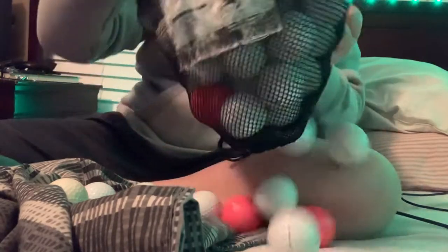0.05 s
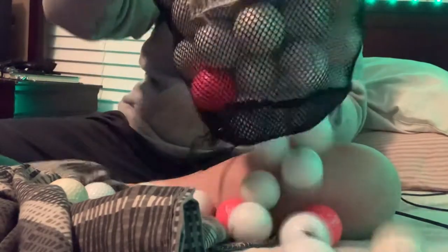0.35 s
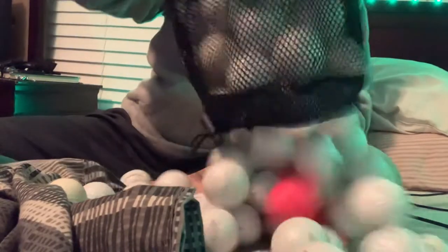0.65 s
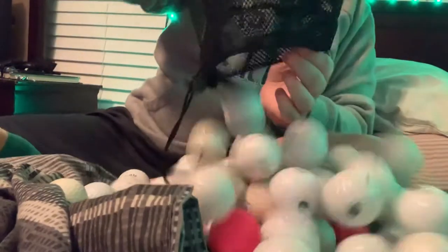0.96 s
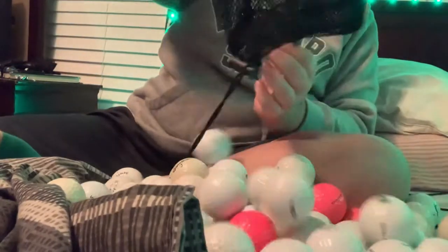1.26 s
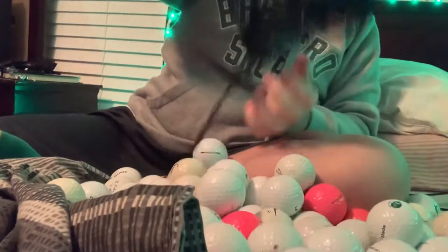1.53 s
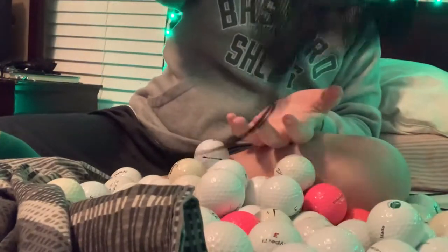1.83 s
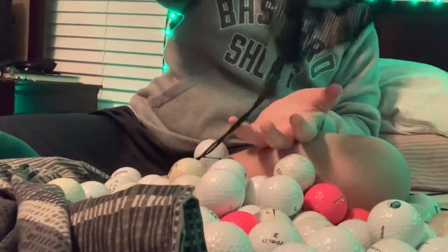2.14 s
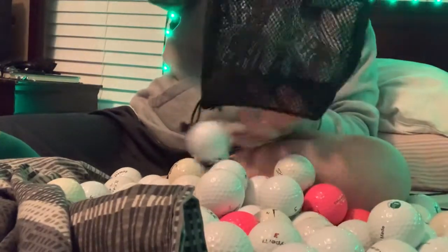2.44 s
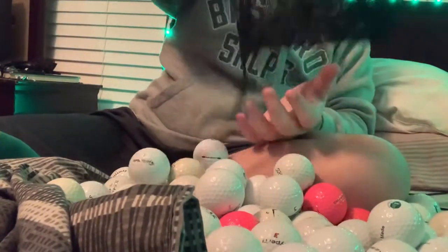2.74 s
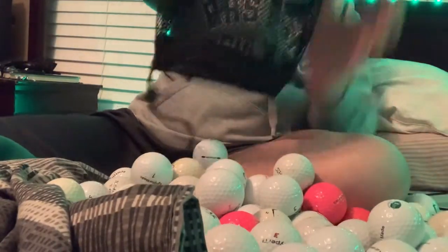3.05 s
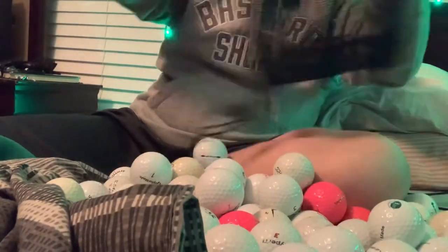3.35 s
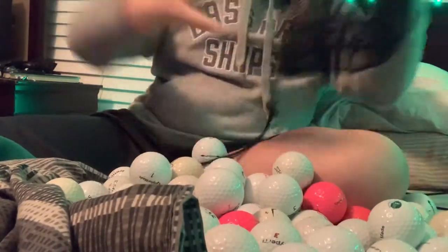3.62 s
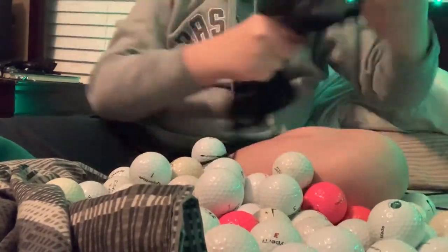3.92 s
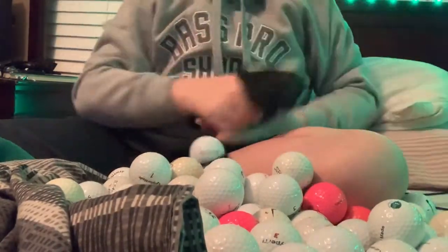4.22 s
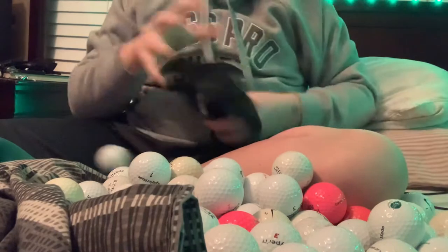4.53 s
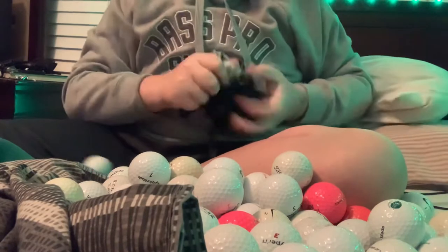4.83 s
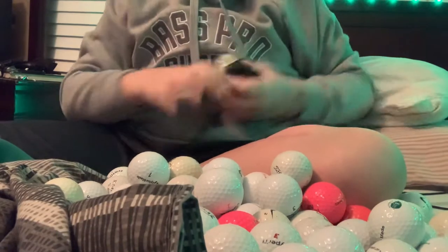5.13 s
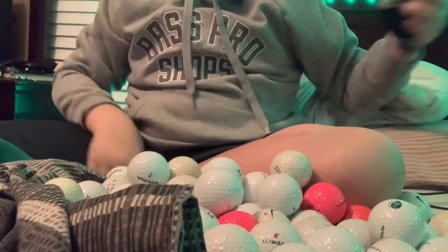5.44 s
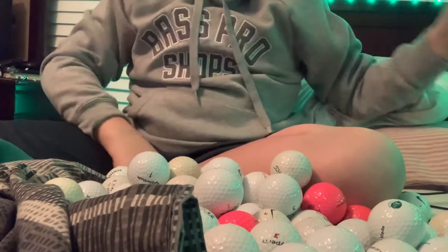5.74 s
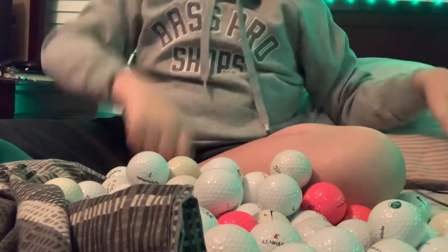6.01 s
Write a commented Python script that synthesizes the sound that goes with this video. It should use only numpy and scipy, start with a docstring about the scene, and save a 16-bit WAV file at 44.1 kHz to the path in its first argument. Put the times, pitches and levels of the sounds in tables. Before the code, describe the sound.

Golf balls spill from a mesh bag onto a pile on a bed, close up in stereo in a small bedroom. Separate hard clacks start at once and build into a dense clatter, loudest from about 0.5 to 1 second, with dull thuds and a low rumble from the mattress underneath. The clacks thin out and stop by 1.5 seconds. The bag rustles lightly, with a hollow tap at 2 seconds, and around 2.5 seconds a last ball drops with a thud and a few clicks. From about 3.2 seconds the empty bag is shaken and crumpled, much quieter than the pour, with dry ticks, scratches and puffy snaps near 3.3, 3.7 and 4.6 seconds. Softer rustling continues as it is put aside, and a hand brushes the pile with a soft bump near 5.9 seconds. A faint fan hums throughout.

```python
"""A small bedroom, close up in stereo: golf balls pour from a mesh bag onto a pile on the bed.
Each clack is a hollow knock, a ringing core and a ticking cover; the mattress thuds and booms below,
and a last ball drops out late. Then the empty bag is shaken, crumpled and put aside, its threads
catching and its folds puffing out air, and a hand brushes the pile. A faint fan hums throughout."""
import sys
import numpy as np
from scipy import signal
from scipy.fft import rfft, irfft, next_fast_len
from scipy.io import wavfile

SR = 44100
rng = np.random.default_rng(int(sys.argv[2]) if len(sys.argv) > 2 else 0)


def master_out(mix):
    """Clip the mix to full scale and print it as 16-bit PCM to the path in sys.argv[1]."""
    frames = np.transpose(np.atleast_2d(mix))
    ceiling = np.clip(frames, -1, 1)
    pcm = np.round(ceiling * 32767).astype(np.int16)
    wavfile.write(sys.argv[1], SR, pcm)


N = 267863
SIZE = next_fast_len(N)
TIME, FREQS = np.arange(N) / SR, np.fft.rfftfreq(SIZE, 1 / SR)

# Cue levels are set ahead of each layer's trim; colours give only the shape of a spectrum.
# fan tones: f/Hz, level/dB
FAN_TONES = [(243, -68), (67.7, -70.5)]
# colour of the room air: f/Hz, level/dB
AIR_COLOUR = [(15, -36), (60, 0.5), (130, -8.5), (250, -5.5), (400, -25), (600, -33), (800, -18.5),
              (1100, -36), (1400, -25.5), (1700, -33.5), (2600, -31.5), (5000, -36), (15000, -40)]
# how hard the balls stream out of the bag: t/s, level/dB
POUR = [(0, -50.5), (.16, -52.5), (.37, -44), (0.531, -36.5), (.67, -32.5), (.92, -34), (1.06, -41.5),
        (1.2, -51), (1.34, -62), (1.5, -79.5)]
# heavy landings of balls and hands on the bedding: t/s, level/dB, nominal f/Hz
HEAVY_LANDINGS = [(0, -26, 109), (0.021, -37, 120), (.168, -35, 172), (0.234, -26, 159), (.366, -26, 192),
                  (.452, -22.5, 158), (.496, -16.5, 123), (.586, -20, 127), (.639, -13.5, 186),
                  (.719, -14, 170), (.738, -19, 119), (.788, -17, 227), (.822, -22, 196), (0.865, -26, 305),
                  (.9, -16.5, 186), (.932, -14.5, 147.4), (0.958, -31, 134), (1.02, -28, 246),
                  (1.06, -31, 175), (1.114, -23.5, 152), (1.14, -18.5, 107), (1.234, -27, 161),
                  (1.262, -30, 98), (1.286, -30, 147), (1.336, -32.5, 185), (1.414, -33, 199),
                  (1.666, -42, 200), (2.018, -31, 113), (2.227, -47.5, 258), (2.343, -39, 167.4),
                  (2.42, -37.5, 153.5), (2.439, -42.5, 175.5), (2.466, -35.5, 183), (2.514, -27.5, 196),
                  (2.552, -38, 107), (2.576, -30.5, 126.7), (2.635, -32.5, 237), (2.67, -41.5, 253.6),
                  (2.951, -41.5, 234.7), (2.972, -37, 141.4), (3.015, -42, 134.7), (3.324, -37, 195),
                  (3.736, -47, 150), (3.883, -50, 127), (4.25, -46.5, 212), (4.942, -47, 101),
                  (5.202, -41.5, 250), (5.235, -38.5, 198), (5.28, -43.5, 239), (5.608, -44.5, 229),
                  (5.909, -35, 198.4), (5.947, -43, 93)]
# the mattress's answer to a landing: ratio to the thud pitch, level/dB, t60/s
MATTRESS_MODES = [(1, 0.5, .07), (.66, -7, 0.095), (1.55, -9, .07), (2.5, -16, .05)]
# the whole bed booming: f/Hz, level/dB, t60/s
BED_BOOM = [(52.1, -18, 0.35), (111.3, -18.5, .22), (226, -19, 0.13), (448, -30.5, 0.057)]
# bedding and clothes pushed about: middle t/s, length/s, level/dB
BEDDING_STIRS = [(1.634, 0.26, -55.5), (2.073, 0.18, -56.5), (2.566, 0.17, -44), (2.998, 0.14, -47.5),
                 (3.283, 0.21, -57), (3.75, 0.079, -50), (4.27, .07, -72), (4.593, 0.04, -52),
                 (5.09, 0.051, -53.5), (5.242, 0.12, -48.5), (5.653, 0.076, -53), (5.917, 0.039, -37.5),
                 (6.07, 0.05, -46)]
# colour of the bedding's rumble: f/Hz, level/dB
RUMBLE_COLOUR = [(15, -33), (30, -5.5), (48, 2), (80, 3), (112, 2.5), (150, -1.5), (240, -0.5), (320, -10),
                 (440, -7), (650, -20.5), (1400, -47.5), (3000, -59)]
# mesh sliding over itself and sleeves: middle t/s, length/s, level/dB, body offset/dB, fizz offset/dB
MESH_SLIDES = [(0.004, 0.075, -55.5, 11, 3.5), (.26, 0.12, -53.5, -3, 8), (0.397, 0.093, -45.5, -11, 1),
               (1.427, .14, -72, -7, 4), (1.584, 0.14, -62, -14.5, -1.5), (1.784, 0.25, -68.5, 5, -2),
               (1.981, 0.058, -56, -5, -2), (2.057, .06, -67, -9, 3), (2.189, 0.14, -65, 2.5, -3.5),
               (2.327, 0.09, -75.5, -6, 6), (2.585, 0.14, -70, 0, -11), (3.286, 0.14, -54, -12, 0.5),
               (3.416, 0.071, -60.5, -11, -6), (3.562, 0.15, -62, -19, 0), (3.806, 0.16, -50.5, -7, 0),
               (3.914, 0.25, -54.5, -25, -4), (4.077, 0.31, -57.5, -5, -1.5), (4.32, 0.2, -57.5, -1, 5.5),
               (4.493, 0.4, -73, -4, 7), (4.636, 0.12, -60.5, 3, 0), (4.723, 0.15, -61.5, 5.5, 8),
               (4.904, 0.044, -57.5, 4, 5), (5.055, 0.16, -56, 7, 4.5), (5.2, 0.18, -61, 3, -1.5),
               (5.388, 0.67, -74.5, -3.5, 2), (5.684, 0.28, -74.5, 7, 10), (5.788, 0.15, -65, -13, 4.5),
               (6.07, 0.064, -61.5, 1.5, 0.5)]
# the bag shaken or tugged taut: t/s, hold/s, level/dB, body offset/dB, swish offset/dB
BAG_FLAPS = [(1.75, .018, -49.5, -15, -17), (2.006, 0.0076, -53, -11, -1), (3.302, .06, -46, -10, 0),
             (3.694, 0.024, -44.5, -5, -5), (4.558, 0.026, -46, 0, 1), (5.901, .015, -44.5, -2, -39)]
# the four colours of the rustle, dark to bright: f/Hz, level/dB
MESH_BODY = [(80, 5), (200, 8), (380, 3.5), (600, 0.5), (1000, -1.5), (1500, -3.5), (2200, -7), (2800, -15),
             (3600, -27)]
MESH_SWISH = [(1300, -30), (2000, -4), (2500, 5), (3000, -14), (3800, -13)]
MESH_RASP = [(1400, -16), (2100, -9.5), (2900, -5), (3700, 3.5), (4500, 2), (5500, -1), (6800, -3),
             (8000, -27.5)]
MESH_FIZZ = [(5800, -21.5), (7200, -3), (8500, 5.5), (11000, 3), (13000, 1.5), (15500, -2)]
# foreground hits, ball on ball: t/s, level/dB, hardness/dB (more means less knock), ring f/Hz
BALL_HITS = [(0.014, -42, -5, 4190), (0.0573, -33, 4.5, 2950), (.0942, -31, 0, 4160),
             (0.1656, -39.5, 7, 3660), (0.2124, -38.5, 2.5, 5400), (0.236, -35, 2, 4040),
             (0.2961, -36.5, 2.5, 3890), (0.3092, -34, 0.5, 4150), (0.351, -35, -0.5, 3680),
             (0.3705, -42, -11.5, 4100), (.383, -35, -4, 3650), (0.394, -35.5, 4, 3980),
             (0.4061, -32.5, 4.5, 4150), (0.4336, -39, -4, 3500), (0.4488, -25.5, 10, 4270),
             (0.457, -29.5, -1.5, 3760), (0.475, -34.5, 1, 3880), (0.4946, -29, -0.5, 4330),
             (.5087, -28, 1, 4740), (0.52, -31, 2.5, 3950), (0.53, -30, -3, 3760), (0.5385, -30, 4, 3880),
             (.548, -25, 4, 4580), (.5664, -25, -2.5, 4330), (0.57, -34.5, 1.5, 4250),
             (0.5782, -29, 6, 5200), (0.5864, -33, -1.5, 4030), (0.6118, -24, 1, 4220),
             (0.619, -26, 2, 4100), (0.6402, -23.5, 2, 3760), (0.657, -26.5, -1, 4380),
             (0.672, -37, -0.5, 4030), (.6823, -31, 11.5, 6000), (0.7039, -23, 6, 4230),
             (0.7179, -28.5, 7.5, 3690), (0.7251, -25.5, 1.5, 5730), (0.7297, -30, 1, 4300),
             (.7565, -35.5, 3.5, 4240), (0.7685, -33.5, -9.5, 4130), (.7824, -31.5, 3.5, 4500),
             (0.7897, -32.5, 1, 3960), (0.7945, -27.5, -3.5, 4420), (.8073, -35.5, -2.5, 3940),
             (.8211, -31.5, -8.5, 4300), (0.8265, -37, -1, 4240), (0.8608, -26, 5, 6100),
             (0.8635, -22, -1.5, 4760), (0.8739, -23, 3.5, 3250), (0.8817, -23, 3.5, 3680),
             (.8918, -36.5, -1, 3550), (0.8965, -29.5, -3, 3940), (0.9055, -30, -1, 3720),
             (0.9222, -30, -2, 3940), (0.9329, -31.5, -1, 4350), (0.9533, -30.5, -3.5, 4020),
             (.973, -28.5, 2, 3720), (0.992, -30.5, -2.5, 3870), (1.0015, -37, 5, 4340),
             (1.0153, -35.5, -4, 4870), (1.0199, -27, -1, 4000), (1.033, -40.5, 6, 3800),
             (1.0642, -35.5, 0.5, 3600), (1.069, -36.5, -0.5, 4460), (1.0835, -45.5, 9.5, 4310),
             (1.1131, -24.5, 1, 3630), (1.134, -29.5, 3, 4050), (1.143, -35.5, 0, 3280),
             (1.1597, -45.5, -1, 4050), (1.1686, -48, 0, 4780), (1.2018, -38.5, 6.5, 4320),
             (1.2518, -39.5, 2, 3980), (1.2548, -45, 14, 4970), (1.271, -42, 4, 5400),
             (1.283, -46, -6, 3400), (1.3172, -35, 6, 4270), (1.348, -51.5, -3, 4120),
             (1.4249, -51.5, 0.5, 4570), (1.5027, -60.5, -8, 4040), (2.4654, -64.5, -13, 3900),
             (2.5127, -50, -7.5, 3600), (2.546, -47.5, -5.5, 4220), (2.5752, -43.5, 2, 4280),
             (2.6133, -57, -6, 4420)]
# the ring of a ball's core: ratio to the ring pitch, level/dB, t60/s
CORE_MODES = [(1, 0, .0105), (1.14, -5, .01), (.88, -11, .008), (.63, -9, .007), (1.43, -7, .008),
              (1.92, -9, .006)]
# mesh and cord snapping: t/s, level/dB, knock offset/dB, tick offset/dB
CORD_SNAPS = [(1.5378, -50.5, -6, 9), (1.7509, -40.5, -10, -12), (1.9797, -46.5, -17, 4.5),
              (2.2906, -49.5, -7, 3), (3.2013, -51.5, -10, -11), (3.2198, -50.5, -2, 2),
              (3.3108, -33.5, -9.5, -3.5), (3.3625, -39, -16, -12), (3.4038, -52, -2, -8),
              (3.6096, -50, -10, 1), (3.7188, -36, -6, -17), (3.7766, -41.5, -8, 0.5),
              (4.0148, -42, -6.5, -8), (4.1547, -48.5, -3.5, 1), (4.2623, -41, -9.5, -13),
              (4.5628, -32.5, -6.5, -12), (4.586, -46, 7, 4), (4.5957, -49, -2, 10), (4.7108, -56, -8, 7),
              (4.721, -62, 6, 2), (4.738, -58, 9, 0), (4.7754, -52, -5, 2), (4.9087, -48.5, 0, -10),
              (4.9158, -55, 3, -4), (5.0458, -48, 14, 10), (5.059, -59, 7, -7), (5.0978, -49.5, 7, 0),
              (5.109, -56, 11.5, -3), (5.1632, -39, -8, -26), (5.2167, -53, 6, 3), (5.2875, -51, -6, -9),
              (5.389, -59.5, -1, -1), (5.8828, -48, -2.5, 4), (5.9004, -44, -5, -7)]
# short scrapes of mesh on mesh: middle t/s, length/s, level/dB, f/Hz
MESH_SCRATCHES = [(1.582, 0.066, -56, 5670), (1.77, 0.0093, -47, 4200), (3.295, 0.033, -52, 6500),
                  (3.316, .018, -49, 2680), (3.367, 0.014, -40, 3000), (3.592, 0.041, -60, 5750),
                  (3.697, .008, -46, 2950), (3.779, .014, -44.5, 3900), (4.202, 0.078, -67, 1700),
                  (4.263, .014, -59, 3200), (4.283, 0.024, -58, 1700), (4.521, 0.055, -65.5, 2170),
                  (4.72, .012, -58, 1500), (4.918, 0.0091, -60, 2200), (5.018, 0.037, -55, 1810),
                  (5.103, 0.03, -59, 1910), (5.745, 0.083, -56.5, 5660), (5.83, 0.078, -59, 5500),
                  (5.985, 0.044, -65, 5960)]
# one hollow tap as a ball is knocked: t/s, level/dB, f/Hz, t60/s
HOLLOW_TAP = (2.0135, -33.5, 1320, .021)
# air clapped out of the folds: t/s, level/dB, f/Hz
AIR_POPS = [(2.017, -50, 480), (2.229, -58, 480), (3.311, -44, 745), (3.3155, -43, 695), (3.334, -49, 420),
            (3.3844, -49.5, 600), (3.6974, -43.5, 446), (3.7181, -45, 650), (3.766, -48, 517),
            (3.823, -49, 710), (4.0256, -54.5, 755), (4.562, -44, 580), (4.583, -46, 565),
            (4.596, -41.5, 480)]
# hands and sleeves on cloth and balls: middle t/s, length/s, level/dB, f/Hz, width/octaves
HAND_RUBS = [(2.175, .04, -64, 1160, 1.9), (2.194, 0.034, -57, 635, 1), (2.928, .035, -61.5, 716, 2.06),
             (2.961, 0.046, -52.5, 420, 1.6), (2.966, 0.046, -65, 1150, 1.6), (3.007, .05, -63, 846, 1.4),
             (3.06, 0.071, -65, 328, 0.91), (5.615, 0.0093, -57, 730, .4), (5.722, 0.15, -65.5, 492, 0.14),
             (5.722, 0.029, -62, 1430, .3), (5.766, 0.016, -56.5, 1410, .4),
             (5.915, .025, -42.5, 594, 0.33), (5.919, 0.041, -47, 1420, 0.4), (6.0, 0.15, -64, 500, 0.28),
             (6.065, 0.026, -60, 270, 0.91)]
# stereo image of the balls, and of cloth and air: f/Hz, left-right likeness (-1 to 1)
BALLS_IMAGE = [(40, 0.94), (150, 0.94), (500, 0.92), (1600, 1), (2300, .7), (3000, -0.26), (4300, .35),
               (5600, -0.72), (6800, 0.53), (7600, 1), (15000, .93)]
CLOTH_IMAGE = [(40, 0.8), (150, 0.84), (1700, 0.94), (2600, 0.59), (4200, 0.52), (5500, -0.59),
               (6600, -0.065), (7500, 1), (15000, 1)]

KNOCK_HZ, RING_HZ, TICK_HZ = (375, 1690), (1840, 7500), (6200, 11600)
POUR_END_S = POUR[-1][0]
SETTLE_S = .08  # the bed moves this long after the stream


def amp(db):
    """Decibels to gain."""
    return 10 ** (np.asarray(db) / 20)


def unit_rms(x):
    """Scales to rms 1."""
    return x / np.sqrt(np.mean(x ** 2) + 1e-20)


def at_level(x, db):
    """Sets the rms of a hit's first 4 ms."""
    return amp(db) * x / np.sqrt(np.mean(x[:, :176] ** 2, axis=1, keepdims=True) + 1e-20)


def add(mix, s, sound):
    """Mixes a sound in at time s."""
    part = mix[..., max(round(s * SR), 0):][..., :sound.shape[-1]]
    part += sound[..., :part.shape[-1]]


def band(x, edges, order=2):
    """Causal band-pass."""
    return signal.lfilter(*signal.butter(order, np.clip(edges, 60, SR / 2 - 500), "band", fs=SR), x)


def curve(points):
    """Joins points on a log frequency axis."""
    hz, value = np.transpose(points)
    return np.interp(np.log(FREQS + 1), np.log(hz + 1), value)


def shaped(x, gain):
    """Multiplies the spectrum of x by a gain."""
    return irfft(rfft(x, SIZE) * gain, SIZE)[..., :N]


def coloured(x, colour):
    """EQs x with a colour, at rms 1."""
    return unit_rms(shaped(x, amp(curve(colour))))


def wander(rate_hz):
    """Smooth random drift of rms 1."""
    return unit_rms(shaped(rng.standard_normal(N), np.exp(-np.minimum(FREQS / rate_hz, 6) ** 2)))


def stereo_image(pair, likeness):
    """Turns two unrelated channels into a pair of the given likeness."""
    same = np.clip(curve(likeness), -1, 1)
    return np.array([pair[0], shaped(pair[0], same) + shaped(pair[1], np.sqrt(1 - same ** 2))])


def impulse(fade_s, scatter, late, late_s):
    """One click, its glancing echoes off what lies nearest, and a weak later wash."""
    t = np.arange(2048) / SR
    echoes = rng.standard_normal((2, len(t))) * (rng.random((2, len(t))) < .25)
    out = echoes * (scatter * np.exp(-t / fade_s) + late * np.exp(-t / late_s))
    out[:, 4] += rng.choice([-1, 1], 2)
    return out


def pour_db(s):
    """Strength of the stream at time s; it dies away once the bag is empty."""
    at, db = np.transpose(POUR)
    return np.interp(s, at, db) - 60 * np.clip((s - POUR_END_S) / .1, 0, 1)


def pour_moments(count):
    """Uneven moments all through the pour."""
    return (np.arange(count) + rng.random(count)) / count * POUR_END_S


def swell(middle_s, length_s, ends_db=-7.5):
    """A hand movement gathers speed and slows again."""
    return amp(ends_db * np.minimum(2 * abs(TIME - middle_s) / length_s, 10) ** 2)


def jerk(s, hold_s, rise_s=.0042, fall_s=.017):
    """Cloth snaps taut, holds and goes slack."""
    return np.exp(-np.maximum(s - TIME, 0) / rise_s - np.maximum(TIME - s - hold_s, 0) / fall_s)


def room_tone(air_db=-65.5, waver=.3):
    """Room air and a wavering fan hum."""
    drift = waver * wander(11)
    hum = sum(amp(db) * np.sqrt(2) * np.sin(2 * np.pi * hz * TIME + drift) for hz, db in FAN_TONES)
    air = stereo_image(coloured(rng.standard_normal((2, N)), AIR_COLOUR), CLOTH_IMAGE)
    return hum * (1 + drift) + amp(air_db) * air


def thud(db, hz, rise_s=.0037, sag=1.74, sag_s=.00248):
    """The mattress gives: its pitch sags as the ball sinks in, and the whole bed booms on."""
    t = np.arange(SR // 3) / SR
    bent_time = t + sag * sag_s * (1 - np.exp(-t / sag_s))
    swing = 0
    for ratio, mode_db, t60 in MATTRESS_MODES:
        mode_hz = hz * ratio * rng.normal(.923, .046)
        swing += amp(mode_db - 60 * t / t60) * np.sin(2 * np.pi * mode_hz * bent_time)
    boom = sum(amp(mode_db - 60 * t / t60) * np.sin(2 * np.pi * (mode_hz * t + rng.random()))
               for mode_hz, mode_db, t60 in BED_BOOM)
    give = 1 - np.exp(-t / rise_s)
    return amp(db) * (swing + boom) * give / abs(swing * give).max()


def heavy_landings(trim_db=-.86, rebound_s=.03, rebound_db=-11.5, rebound_pitch=.89):
    """Each big thud comes down once more, softer and lower."""
    out = np.zeros(N)
    for s, db, hz in HEAVY_LANDINGS:
        add(out, s, thud(db + trim_db, hz))
        add(out, s + rebound_s, thud(db + trim_db + rebound_db, hz * rebound_pitch))
    return out


def bedding_rumble(trim_db=-2, lump_db=3, rolling_db=5, fidget_db=-69):
    """Dull, lumpy weight of rolling balls, shifting bedding and clothes that never lie quite still."""
    rolling = amp(pour_db(TIME - SETTLE_S) + rolling_db)
    stirring = sum(amp(db) * swell(s, length) for s, length, db in BEDDING_STIRS)
    rumble = coloured(rng.standard_normal((2, N)), RUMBLE_COLOUR)
    return rumble * (rolling + amp(fidget_db) + stirring) * amp(trim_db + lump_db * wander(30))


def mesh_envelopes(flap_fizz_db=-3):
    """Strength of the rasp, body and fizz of the mesh over all slides and flaps."""
    moves = [amp([[db], [db + body], [db + fizz]]) * swell(s, length)
             for s, length, db, body, fizz in MESH_SLIDES]
    moves += [amp([[db], [db + body], [db + flap_fizz_db]]) * jerk(s, hold)
              for s, hold, db, body, _ in BAG_FLAPS]
    return np.sqrt(sum(move ** 2 for move in moves))


def thread_catches(per_s, ceiling, spread_db=3):
    """Sparse spikes of uneven size, one for each thread that catches."""
    size = amp(spread_db * np.minimum(rng.exponential(1, N), ceiling))
    return unit_rms(size * (rng.random(N) < per_s / SR))


def mesh_rustle(body_db=-3, rasp_db=-.5, fizz_db=1.96, swish_db=-5, flutter_db=1.72, shift_db=1.5):
    """Threads catch and slip: fine grains over a smooth hiss, in clumps of shifting colour."""
    grain = .77 + .5 * thread_catches(per_s=1600, ceiling=4)
    threads = rng.standard_normal((2, N)) * grain * amp(flutter_db * wander(62))
    rasp, body, fizz = (part * amp(shift_db * wander(27)) for part in mesh_envelopes())
    swish = sum(amp(db + offset) * jerk(s, hold) for s, hold, db, _, offset in BAG_FLAPS)
    return (coloured(threads, MESH_BODY) * body * amp(body_db)
            + coloured(threads, MESH_RASP) * rasp * amp(rasp_db)
            + coloured(threads, MESH_FIZZ) * fizz * amp(fizz_db)
            + coloured(threads, MESH_SWISH) * swish * amp(swish_db))


def mesh_crinkles(trim_db=-2, spread_db=4, low_hz=1600, high_hz=7000, width=1.35, count=320):
    """Folds give way one by one, each with its own colour, as loud as the rubbing is hard."""
    out, effort = np.zeros((2, N)), mesh_envelopes()[0]
    for when, force, pitch in rng.random((count, 3)):
        at, hz = int(when * N), low_hz * (high_hz / low_hz) ** pitch
        click = impulse(fade_s=.0012, scatter=.62, late=.031, late_s=.0089)
        crinkle = band(click, (hz / width, hz * width))
        add(out, at / SR, effort[at] * at_level(crinkle, trim_db + spread_db * (2 * force - 1)))
    return out


def clack(knock_db, ring_db, tick_db, ring_hz, detune=.08, uneven_db=5, onset_s=.0009):
    """Two balls meet: a hollow knock, the short ring of their cores, the tick of the hard covers."""
    blow = impulse(fade_s=.0012, scatter=.6, late=.02, late_s=.008)
    t = np.arange(blow.shape[1]) / SR
    modes = 0
    for ratio, db, t60 in CORE_MODES:
        varies = ratio != 1  # no two balls have the same overtones
        hz = ring_hz * ratio * (1 + detune * varies * rng.uniform(-1.3, 1))
        mode_db = db + uneven_db * varies * rng.uniform(-1, 1)
        modes += amp(mode_db - 60 * t / t60) * np.sin(2 * np.pi * (hz * t + rng.random((2, 1))))
    ring = at_level(modes * (1 - np.exp(-t / onset_s)), 0) + .62 * at_level(band(blow, RING_HZ), 0)
    # blows under -23 dB stay in touch for longer, so they knock lower
    dulling = amp(.2 * min(knock_db + 23, 0))
    knock = band(blow, np.array(KNOCK_HZ) * dulling)
    tick = band(blow, TICK_HZ, order=1)
    return at_level(knock, knock_db) + at_level(ring, ring_db) + at_level(tick, tick_db)


def ball_hits(knock_db=.5, ring_db=1.18, tick_db=-4.5):
    """The foreground clacks: a cushioned ball knocks more than it rings."""
    out = np.zeros((2, N))
    for s, db, hardness, hz in BALL_HITS:
        add(out, s, clack(db - hardness + knock_db, db + ring_db, db - .24 * hardness + tick_db, hz))
    return out


def ball_tumble(knock_db=1, ring_db=1, tick_db=-4, spread_db=3, ring_hz=4150, count=50):
    """Midground clacks as the balls roll down the pile, as strong as the stream."""
    out = np.zeros((2, N))
    for s, (force, knock, pitch) in zip(pour_moments(count), rng.uniform(-1, 1, (count, 3))):
        db = pour_db(s) + spread_db * force
        hz = ring_hz * (1 + .16 * pitch)
        add(out, s, clack(db + knock_db + spread_db * knock, db + ring_db, db + tick_db, hz))
    return out


def ball_jostle(peak_per_s, spread_db, trim_db, knock_db, tick_db, ring_range_hz, balls):
    """A wash of small clacks, each ball with its own pitch; a thin stream gives fewer, separate ones."""
    length = int(POUR_END_S * SR)
    crowd, out = np.zeros((2, length)), np.zeros((2, N))
    stream_db = pour_db(TIME[:length])
    density = amp(.55 * (stream_db - stream_db.max()))
    for hz in np.geomspace(*ring_range_hz, balls):
        size, chance, sign = rng.random((3, 2 * SR))[:, :length]
        force = amp(spread_db * np.minimum(-np.log(1 - size), 3))
        struck = chance < density * peak_per_s / balls / SR
        hits = force * np.sign(sign - .5) * struck / np.sqrt(density)
        crowd += signal.oaconvolve(hits[None], clack(knock_db, 0, tick_db, hz), axes=1)[:, :length]
    add(out, 0, unit_rms(crowd))
    return out * amp(pour_db(TIME) + trim_db)


def pile_ring(x, ring_db=-12, low_hz=3450, high_hz=4650, t60=.24):
    """The other balls of the pile ring on faintly in sympathy."""
    t = np.arange(SR // 3) / SR
    tail = band(rng.standard_normal((2, len(t))), (low_hz, high_hz)) * amp(-60 * t / t60)
    tail *= amp(ring_db) * np.sqrt(2 * (high_hz - low_hz) / SR) / np.linalg.norm(tail[0])
    return signal.oaconvolve(x, tail, axes=1)[:, :N]


def light_landings(trim_db=12.5, spread_db=3, low_hz=150, high_hz=380, count=36):
    """Lesser thuds follow the stream onto the bed."""
    out = np.zeros(N)
    for s, (force, pitch) in zip(pour_moments(count), rng.random((count, 2))):
        db = pour_db(s) + trim_db + spread_db * (2 * force - 1)
        add(out, s + SETTLE_S, thud(db, low_hz * (high_hz / low_hz) ** pitch))
    return out


def cord_snaps(trim_db=-2.94):
    """The mesh and its cord catch and let go: dry ticks without a ring."""
    out = np.zeros((2, N))
    for s, db, knock, tick in CORD_SNAPS:
        click = impulse(fade_s=.0016, scatter=.57, late=.018, late_s=.0066)
        for edges_hz, offset_db in [((900, 2500), knock), ((2400, 6000), 0), (TICK_HZ, tick)]:
            add(out, s, at_level(band(click, edges_hz), db + offset_db + trim_db))
    return out


def mesh_scratches(trim_db=.5, width=1.33):
    """Threads skip over each other in a quick run; the tighter the mesh, the higher the scratch."""
    grain = .45 + thread_catches(per_s=650, ceiling=3)
    threads = rng.standard_normal((2, N)) * grain
    return sum(amp(db + trim_db) * swell(s, length) * unit_rms(band(threads, (hz / width, hz * width)))
               for s, length, db, hz in MESH_SCRATCHES)


def hollow_tap():
    """A single damped note as a ball is knocked."""
    s, db, hz, t60 = HOLLOW_TAP
    out, t = np.zeros(N), np.arange(SR // 10) / SR
    add(out, s, amp(db - 60 * t / t60) * np.sin(2 * np.pi * hz * t))
    return out


def air_pops(width=1.76):
    """The folds clap out short, hollow puffs that give the snaps their body."""
    out = np.zeros((2, N))
    for s, db, hz in AIR_POPS:
        puff = impulse(fade_s=.0039, scatter=.44, late=.04, late_s=.01)
        add(out, s, at_level(band(puff, (hz / width, hz * width)), db))
    return out


def hand_rubs(trim_db=-3):
    """Skin and sleeves drag over cloth and balls in hollow tones."""
    out = np.zeros(N)
    for s, length, db, hz, octaves in HAND_RUBS:
        edges_hz = hz * 2 ** (np.array([-.5, .5]) * octaves)
        friction = unit_rms(band(rng.standard_normal(N), edges_hz, order=3))
        out += amp(db + trim_db) * swell(s, length) * friction
    return out


def bedroom(x, wet_db, near_gain, low_t60=.36, high_t60=.33):
    """Six near reflections and a short, soft tail whose treble dies first."""
    t = np.arange(SR // 2) / SR
    wash = rng.standard_normal((2, len(t))) * np.clip((t - .004) / .0042, 0, 1)
    tail = band(wash, (90, 4500)) * amp(-60 * t / low_t60)
    tail += 1.3 * band(wash[::-1], (4500, 15000)) * amp(-60 * t / high_t60)
    tail *= amp(wet_db) / np.linalg.norm(tail[0])
    for delay_s in np.geomspace(.004, .021, 6):
        at = (SR * delay_s * rng.uniform(.9, 1.1, 2)).astype(int)
        tail[[0, 1], at] += near_gain * rng.choice([-1, 1], 2) * np.exp(-delay_s / .049)
    return signal.oaconvolve(x, tail, axes=1)[:, :N]


def scene():
    """Three stems, balls, bag and bed, sit a hair to the left over the room tone."""
    dull_jostle = ball_jostle(peak_per_s=260, spread_db=4, trim_db=-9.5, knock_db=-3.5, tick_db=-5,
                              ring_range_hz=(2260, 3230), balls=8)
    balls = ball_hits() + ball_tumble() + dull_jostle
    balls += ball_jostle(peak_per_s=520, spread_db=2.5, trim_db=.85, knock_db=-1.5, tick_db=-4.5,
                         ring_range_hz=(3150, 5200), balls=20)
    bed = heavy_landings() + light_landings() + hollow_tap() + hand_rubs()
    bag = mesh_rustle() + mesh_crinkles() + cord_snaps() + mesh_scratches() + air_pops()
    tails = pile_ring(balls) + bedroom(balls + bed, wet_db=-14, near_gain=.16)
    balls = stereo_image(balls + tails + bedding_rumble(), BALLS_IMAGE)
    bag = stereo_image(bag + bedroom(bag, wet_db=-12.5, near_gain=.18), CLOTH_IMAGE)
    return (balls + bag + bed) * amp([[.15], [-.15]]) + room_tone()


def record(dry, lag_above_hz=7600, cutoff_hz=15900):
    """In the top octave the left channel lags by a quarter millisecond; then a steep high cut."""
    lag_phase = 2 * np.pi * np.maximum(FREQS - lag_above_hz, 0) / 3740
    wide = shaped(dry, np.exp(.5j * np.array([-lag_phase, lag_phase])))
    high_cut = signal.firwin(401, cutoff_hz, window=("kaiser", 9), fs=SR)
    return signal.oaconvolve(wide, high_cut[None], "same")


dry = scene()
out = record(dry)
master_out(out)
```